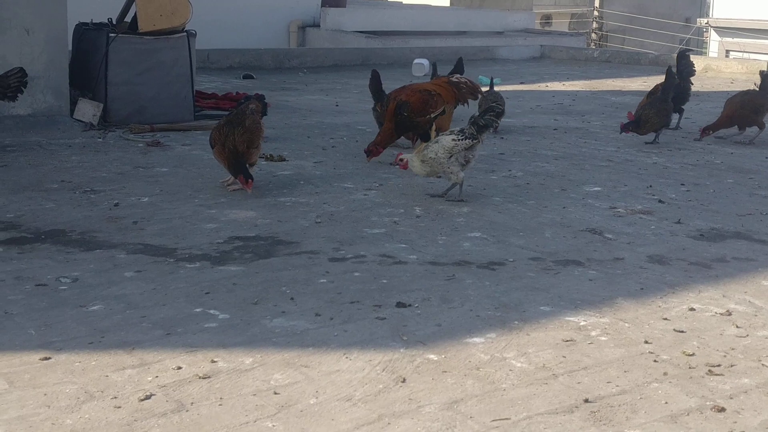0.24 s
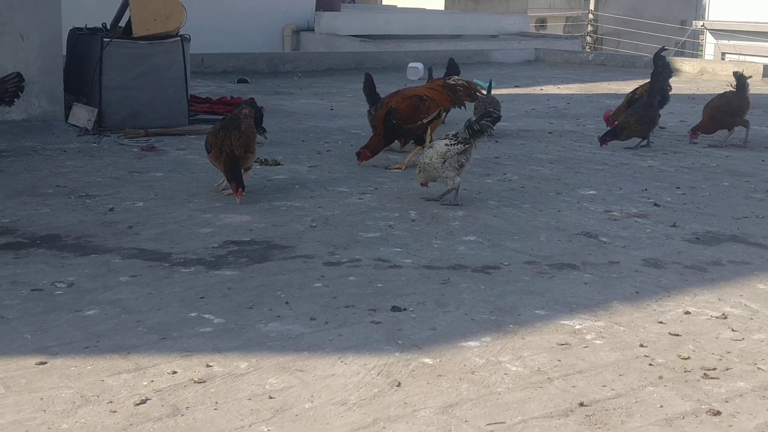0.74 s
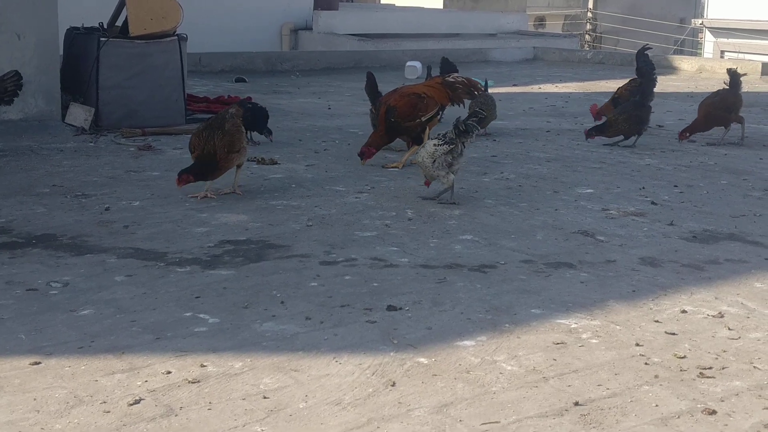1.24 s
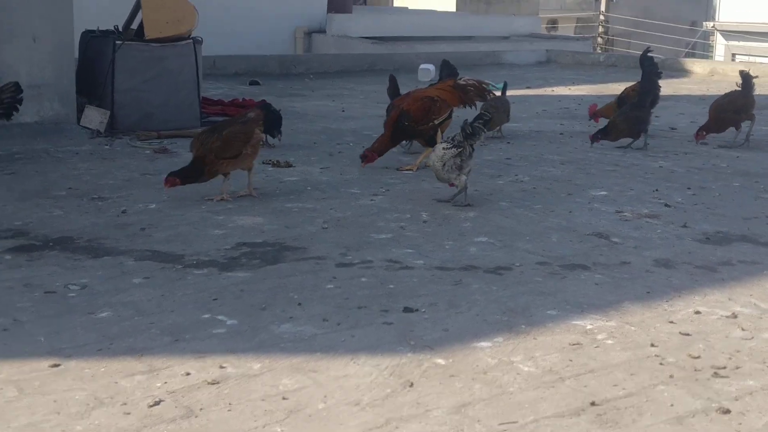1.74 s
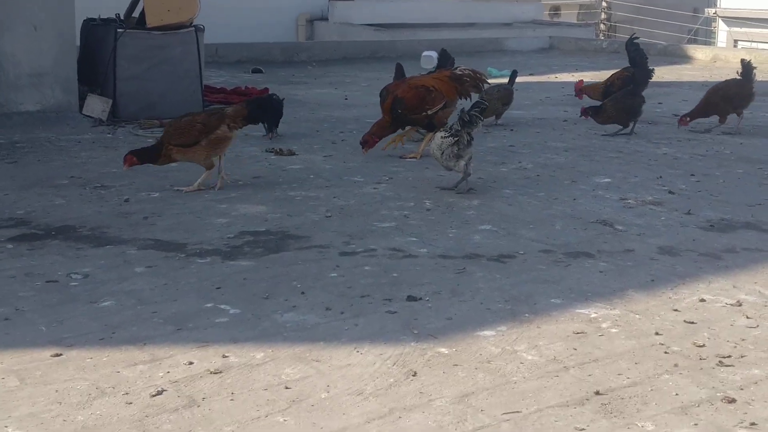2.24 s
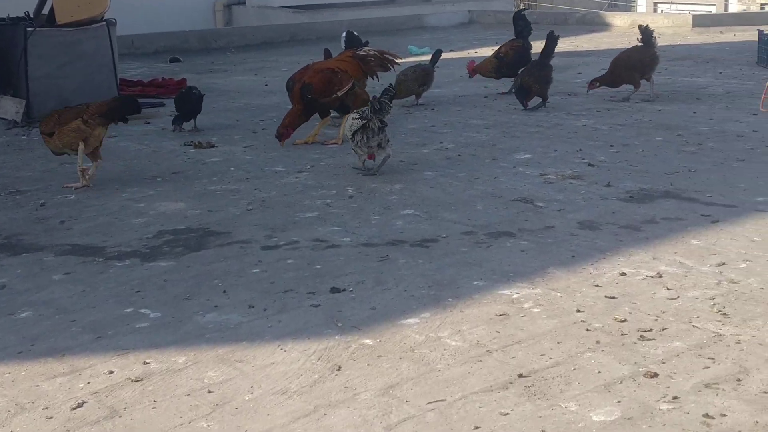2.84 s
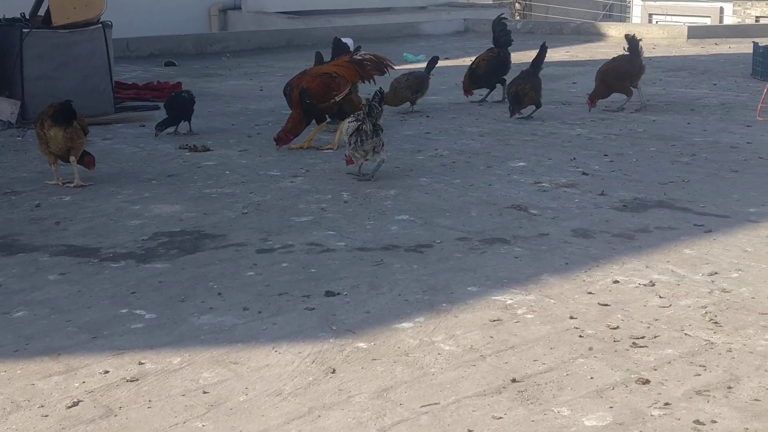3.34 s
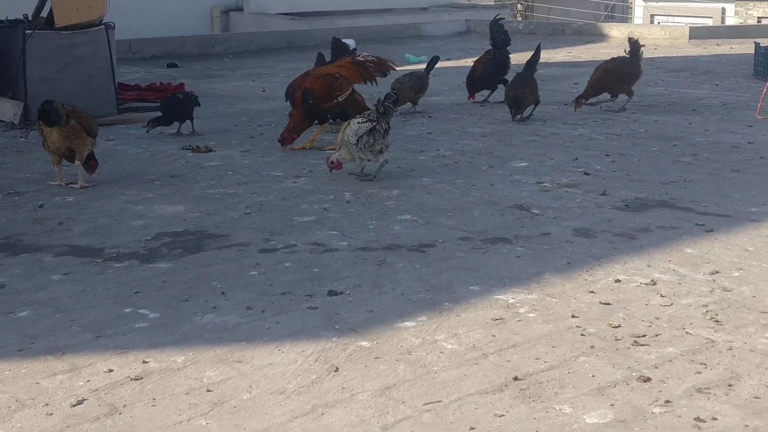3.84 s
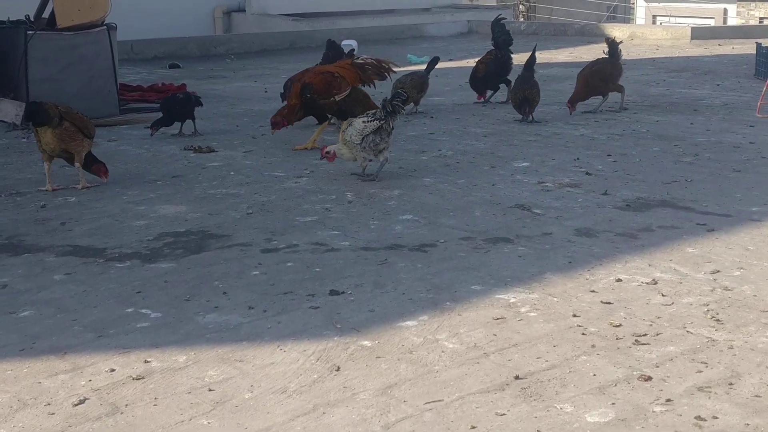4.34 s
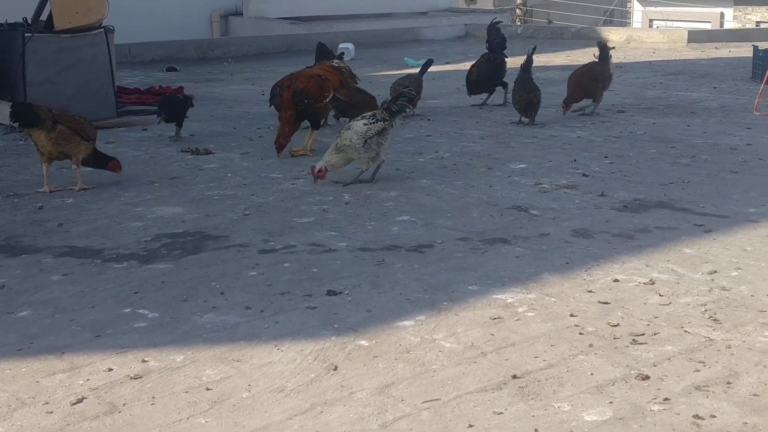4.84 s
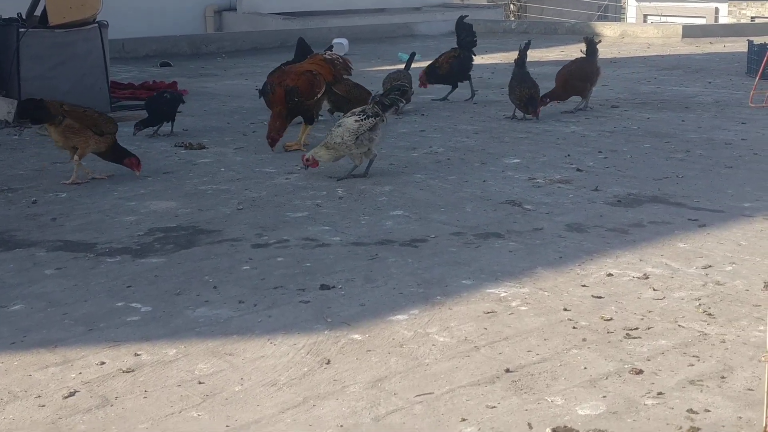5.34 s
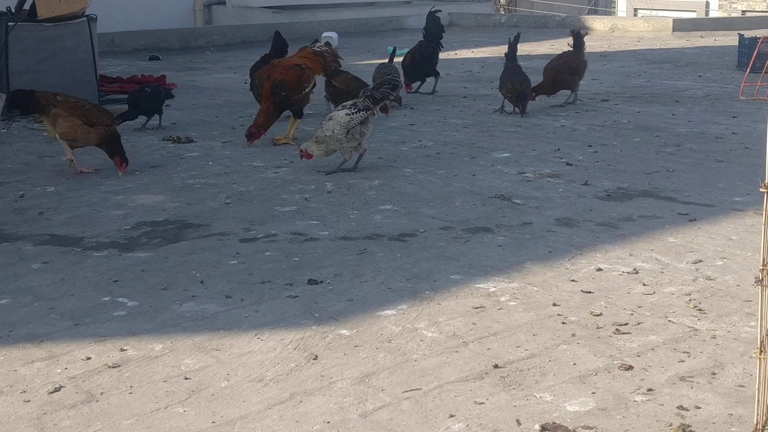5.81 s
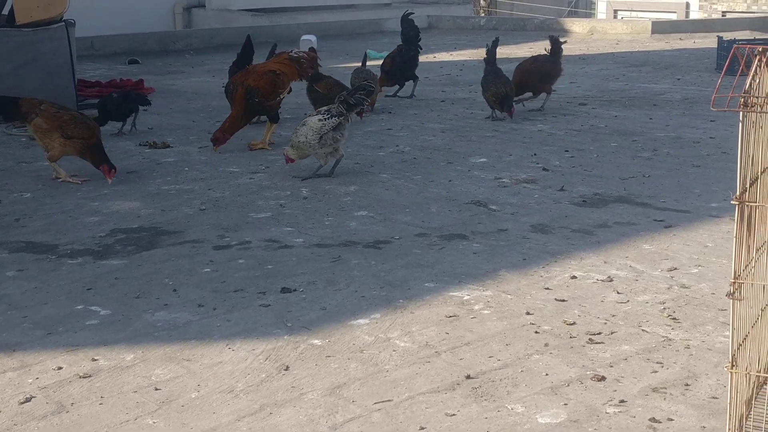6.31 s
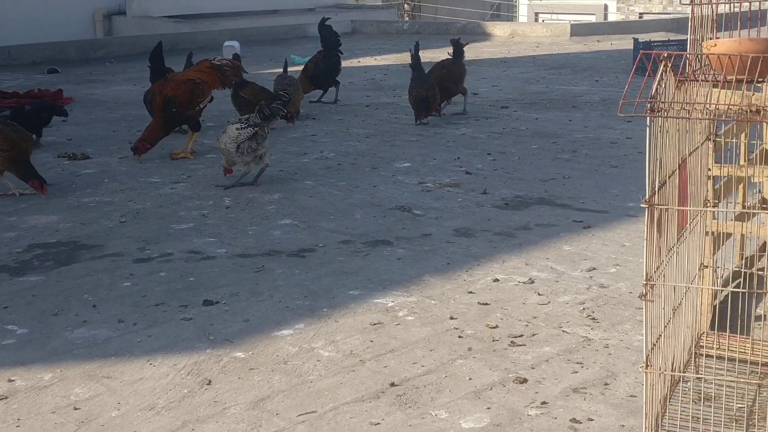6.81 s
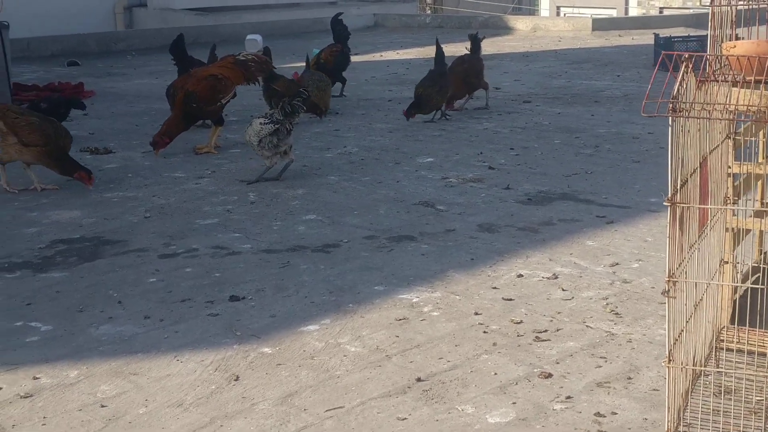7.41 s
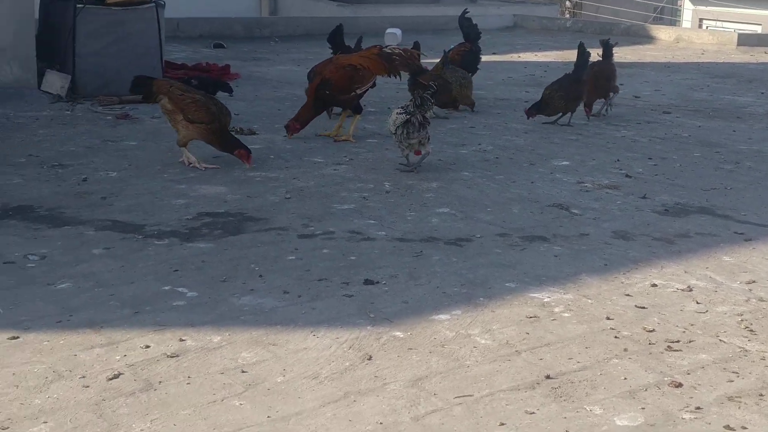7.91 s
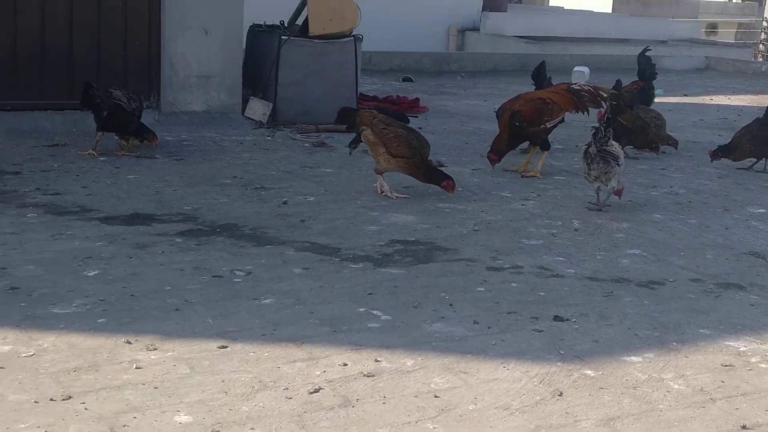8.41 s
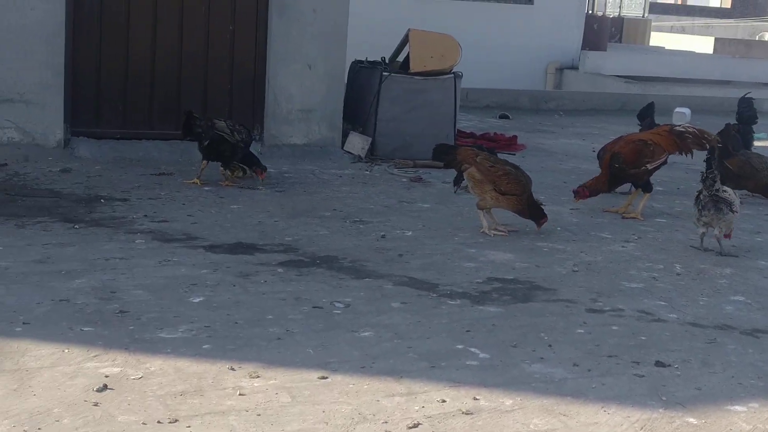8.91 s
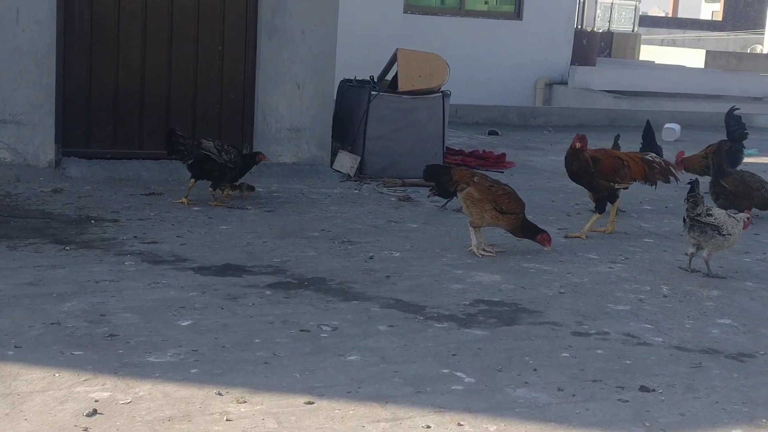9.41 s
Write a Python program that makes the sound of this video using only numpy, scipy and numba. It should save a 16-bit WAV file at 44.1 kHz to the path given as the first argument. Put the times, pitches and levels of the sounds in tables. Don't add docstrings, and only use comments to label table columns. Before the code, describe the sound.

A rooster gives a long run of soft, quick, throaty food clucks across a concrete yard, with faint chick peeps and low distant rumble.

```python
import sys
import numpy as np
from scipy import signal
from scipy.fft import rfft, irfft
from scipy.io import wavfile
from scipy.ndimage import uniform_filter1d
from numba import njit

SR = 44100
rng = np.random.default_rng(int(sys.argv[2]) if len(sys.argv) > 2 else 0)


def waveform_to_disk(signal):
    frames = np.transpose(np.atleast_2d(signal))
    scaled = np.clip(frames, -1, 1) * 32767
    samples = np.round(scaled).astype(np.int16)
    wavfile.write(sys.argv[1], SR, samples)


def decibels_to_gain(level_db):
    exponent = np.asarray(level_db, float) / 20
    return 10 ** exponent


N = 426006
TIME = np.arange(N) / SR
USUAL_MS = 30

# freq_hz, level_db (per Hz)
TOWN_TONE = [(30, -12), (55, 7.5), (130, 2), (250, -6), (420, -16), (620, -7.5), (900, -8.5), (1400, -13),
             (2400, -15.5), (3600, -24.5), (5300, -32.5), (7300, -51.5), (10000, -43.5), (16000, -47)]
# freq_hz, difference_db
PORT_DIFFERENCE = [(60, -10.5), (110, -6.5), (200, -3), (380, -0.5), (700, -3), (1290, -6), (2380, -6.5),
                   (4400, -3.5), (8120, 11), (15000, 12)]
# freq_hz, lead_radians
PORT_LEAD = [(0, .7), (690, 1.1), (1720, 4.3), (2150, 5.9), (3700, 9.8), (4390, 12.7), (22050, 40)]
# start_s, length_ms, level_db
CLOTH_SLIDES = [(.88, 116, -62), (.98, 100, -63), (1.4, 143, -66.5), (1.7, 162, -54.5), (2.0, 62, -65.5),
                (2.29, 95, -61), (2.379, 220, -63.5), (2.56, 71, -54.5), (2.63, 190, -65.5),
                (2.8, 112, -50), (3.02, 147, -54.5), (3.198, 104, -53.5), (3.352, 58, -69.5),
                (5.7, 50, -65.5), (5.81, 55, -59.5), (5.949, 49, -64.5), (6.07, 70, -66), (6.2, 76, -70.5),
                (6.93, 48, -65.5), (7.17, 89, -65.5), (8.87, 76, -64.5), (9.15, 700, -66)]
# freq_hz, level_db (per Hz)
CLOTH_TONE = [(2500, 1), (3500, 5.5), (5500, 1), (7500, -4.5), (9000, 0), (10400, 7), (14000, 0),
              (16000, 2)]
# start_s, peak_db
CLOTH_TICKS = [
    (0.3501, -55),
    (0.401, -48.5),
    (0.5872, -55),
    (1.684, -46),
    (1.9822, -43.5),
    (3.501, -47),
    (5.125, -41.5),
    (6.9164, -61),
    (8.311, -50),
]
# start_s, level_db, top_pitch_hz
CHICK_PEEPS = [(.067, -56, 4900), (.46, -58, 5200), (.624, -53.5, 4930), (.81, -56.5, 4300),
               (.89, -58, 4805), (1.237, -58, 4300), (1.315, -57.5, 4920), (1.474, -54, 4425),
               (4.577, -59.5, 4552), (4.668, -61, 4627), (4.738, -59, 4100), (4.832, -55.5, 5090),
               (4.915, -63, 4564), (5.155, -57, 5060), (5.28, -57, 4090), (5.422, -61, 4300),
               (5.642, -59, 5300), (6.125, -61, 5000), (6.346, -56, 5220), (6.61, -57.5, 4075),
               (6.665, -63.5, 5135), (7.125, -60, 5220), (8.553, -62.5, 5086), (8.799, -56.5, 4300),
               (9.09, -63, 5000), (9.176, -58.5, 3900)]
# start_s, level_db, start_pitch_hz, end_pitch_hz
CHICK_WHINES = [(1.273, -61, 5610, 4976), (1.44, -51.5, 3223, 2655), (2.946, -51, 4300, 3253),
                (2.965, -50.5, 4300, 4440), (6.33, -60.5, 4113, 3686), (3.091, -45, 3990, 3088),
                (3.099, -48.5, 4974, 4300), (3.9, -63, 4000, 2925), (4.554, -64, 5590, 4985),
                (4.879, -69, 5600, 5120), (5.385, -67, 5466, 4870)]
# start_s, length_ms, level_db, start_pitch_hz, end_pitch_hz
HEN_MURMURS = [
    (9.29, 28.4, -43, 302.2, 302),
    (9.369, 23.5, -30.5, 256.7, 297),
    (9.401, 10.1, -34, 305, 312),
    (9.465, 30.4, -37, 356.6, 336.5),
    (9.503, 13.88, -37.5, 357, 373),
    (9.522, 18, -40.5, 317, 318),
]
# start_s, length_ms, level_db,
# attack_pitch_hz
ROOSTER_CLUCKS = [(.003, 47, -34.5, 342), (.05, 11.1, -41.5, 335), (0.152, 16.7, -27.5, 341.8),
                  (0.276, 34.6, -36.5, 349.7), (.344, 26.6, -36.5, 348.3), (.415, 13.8, -24, 333.5),
                  (0.536, 19, -31, 342.8), (0.666, 12.5, -26.5, 353), (.784, 10.9, -27, 319.8),
                  (.896, 16.6, -21, 330.6), (1.016, 19.7, -25, 308), (1.131, 19.9, -24.5, 326.3),
                  (1.257, 20.3, -21, 317.5), (1.38, 21, -22, 322.2), (1.505, 21, -25.5, 317.9),
                  (1.629, 22.2, -22, 316.3), (1.755, 16, -23.5, 306.2), (1.875, 26.5, -25, 310.8),
                  (2.005, 26.8, -25.5, 314), (2.144, 27.6, -23.5, 316), (2.3, 29.8, -22.5, 315.3),
                  (2.451, 10.2, -35, 329), (2.464, 45.4, -25.5, 306.7), (2.578, 31, -23.5, 341.5),
                 (2.607, 21.2, -28.5, 320.6), (2.73, 27.3, -25.5, 315.5), (2.826, 22.3, -25.5, 332.2),
                 (2.964, 24.3, -22, 313.4), (3.104, 23, -25.5, 304.7), (3.247, 29.4, -24.5, 317.3),
                 (3.389, 13, -32, 320.3), (3.401, 14.5, -24, 297.3), (3.418, 18.5, -24.5, 307),
                 (3.566, 34.2, -22.5, 310), (3.723, 25.8, -26.5, 301.6), (3.772, 39, -38, 308.3),
                 (3.814, 21, -25, 325.7), (3.849, 17, -28.5, 331.4), (3.966, 9, -25, 305.2),
                 (3.977, 39, -35, 331.7), (4.121, 31, -28.5, 300.7), (4.266, 35, -28, 305.7),
                 (4.422, 24, -26.5, 318.7), (4.549, 11.2, -35.5, 291.6), (4.56, 29.8, -26, 318.2),
                  (4.672, 14, -31.5, 340.3), (4.684, 11, -21.5, 334), (4.703, 13, -32, 332),
                  (4.794, 34, -29.5, 305.4), (4.92, 31, -27.5, 326.2), (5.051, 33, -27, 334.2),
                  (5.134, 20.7, -25, 326.3), (5.238, 19.6, -26, 335.7), (5.351, 22.8, -26.5, 324.2),
                  (5.471, 27.8, -27, 323.2), (5.593, 25.2, -30, 328.7), (5.709, 28.7, -26, 347.5),
                  (5.823, 33.3, -26, 320.3),
                  (5.953, 29.48, -24, 366.4), (6.082, 35.43, -23, 372), (6.224, 24.66, -24, 403),
                (6.368, 32.68, -29, 431.8), (6.465, 56.4, -28, 354.8), (6.585, 22.83, -26.5, 403.5),
                (6.696, 27.6, -27, 399.5), (6.819, 31.84, -28.5, 398.6), (6.94, 38.04, -27, 369.3),
                (7.075, 36.5, -27.5, 413.5), (7.166, 73.1, -27.5, 334.2), (7.311, 35, -24.5, 383),
                (7.446, 36.24, -23, 390), (7.585, 39.9, -25.5, 373.2), (7.723, 29.8, -27.5, 411.7),
                (7.85, 42.3, -26, 421), (7.914, 76, -28, 372.4), (7.988, 34, -28, 350.2),
                (8.098, 37.2, -26.5, 393.5), (8.234, 34.6, -25.5, 448.8), (8.368, 38.2, -25.5, 407.7),
                (8.49, 34.6, -25.5, 433.4), (8.634, 37.55, -24, 418.5), (8.731, 31.5, -25.5, 413.2),
                (8.874, 40.36, -25, 426.5), (9.057, 48, -24.5, 398.5), (9.126, 59, -31, 390),
                (9.182, 33.4, -34.5, 384.3), (9.526, 12, -33, 321)]
# time_s, resting_pitch_hz, roughness (0-1)
RESTING_MEMBRANE = [(0, 306.7, 0.18), (1.3, 301.3, 0.3), (2.2, 305.9, 0.25), (2.5, 314.3, 0.23),
                    (2.999, 307.3, 0.26), (4.1, 309.1, 0.04), (4.598, 325.9, 0.22), (5.198, 311.6, 0.3),
                    (5.8, 325.8, 0.32), (6.198, 324.7, 0.2), (6.9, 303.4, 0.2), (7.95, 337.7, .15),
                    (8.13, 318, .2), (8.6, 310.1, 0.24), (8.999, 338.8, 0.23)]
# time_s, windpipe_hz, opening (0-1), beak_hz, beak_db
THROAT_SHAPE = [(0, 860, 0.8, 2530, -23), (.85, 955, 0.54, 2770, -17.5), (2, 947, 1, 2504, -22),
                (4.3, 928.8, 1, 2549, -21.5), (4.5, 980, 0.77, 2828, -16), (5.7, 959.4, 0.54, 2806, -21),
                (6, 845, .01, 2779, -22), (7.1, 827, 0.04, 2922, -15.5), (7.7, 889.5, .01, 2932, -22),
                (9.3, 873, 0.05, 2694, -16.5)]
# freq_hz, width_hz, level_db
UPPER_RINGS = [(2127, 597, -29.5), (3510, 990, -41), (4300, 200, -40), (5300, 1300, -45), (6170, 460, -44)]


def level(x, db):
    return x * decibels_to_gain(db) / np.sqrt(np.mean(x ** 2))


def colour(x, table):
    hz, db = np.transpose(table)
    f = np.fft.rfftfreq(N, 1 / SR) + 1
    gain = decibels_to_gain(np.interp(np.log(f), np.log(hz), db))
    return irfft(rfft(x) * gain, N)


@njit
def moving_ring(x, hz, width):
    y, b, l = np.empty(len(x)), 0., 0.
    for i in range(len(x)):
        g, k = np.tan(np.pi * hz[i] / SR), width[i] / hz[i]
        v = (b + g * (x[i] - l)) / (1 + g * (g + k))
        b, l, y[i] = 2 * v - b, l + 2 * g * v, k * v
    return y


def ring(x, hz, width):
    return moving_ring(x + 1e-18, hz + 0 * x, width + 0 * x)


def double_ring(x, hz, width):
    return ring(ring(x, hz, width), hz, width)


def walk(rate):
    k = int(SR / rate)
    held = np.repeat(rng.standard_normal(N // k + 1), k)
    return 1.3 * uniform_filter1d(uniform_filter1d(held, k), k)[:N]


@njit
def membrane(hz, rough, chance, jitter, shimmer):
    y, phase, k = np.zeros(len(hz) + 1), 0., 0
    for i in range(len(hz)):
        step = hz[i] * (1 + jitter * rough[i] * chance[k, 0]) / SR
        phase += step
        if phase >= 1:
            phase, k = phase - 1, k + 1
            size = np.exp(shimmer * rough[i] * chance[k, 1])
            y[i] += size * phase / step
            y[i + 1] += size * (1 - phase / step)
    return y[:-1]


def notes(table, rise_s, fall_s, lead_db, lead_s, swell_db):
    push, hz, rough = np.zeros(N), np.full(N, 300.), np.zeros(N)
    tail_db, tail_s = -12, .018
    for s, ms, db, start_hz, end_hz, r in table:
        a, b = max(int((s - .04) * SR), 0), min(int((s + ms / 1000 + .06) * SR), N)
        t = TIME[a:b] - s
        after = t - ms / 1000
        u = np.clip(t * 1000 / ms, 0, 1)
        murmur = decibels_to_gain(lead_db) * np.exp(np.minimum(t, 0) / lead_s)
        attack = 1 / (1 + np.exp(-t / (rise_s * max(ms / USUAL_MS, 1) ** 2)))
        opening = murmur + (1 - decibels_to_gain(lead_db)) * attack
        closing = 1 / (1 + np.exp(after / fall_s))
        leak = decibels_to_gain(tail_db) * np.exp(np.minimum(-after, 0) / tail_s)
        shape = decibels_to_gain(db + swell_db * (2 * u - 1)) * opening * np.maximum(closing, leak)
        louder = np.flatnonzero(shape > push[a:b])
        push[a + louder] = shape[louder]
        bend = start_hz + (end_hz - start_hz) * u ** 1.3
        pitch = bend - 1800 * np.maximum(after, 0) + 1500 * np.minimum(t, 0)
        hz[a + louder] = pitch[louder]
        rough[a + louder] = np.clip(r + .15 * (2 * u - 1) ** 2, 0, 1)[louder]
    return push, hz, rough


def voice(table, **shape):
    push, hz, rough = notes(table, **shape)
    chance = np.clip(rng.standard_normal((N // 50, 2)), -2, 2)
    pulses = membrane(hz, rough, chance, jitter=.12, shimmer=.5)
    return push, level(pulses, 0) * push, hz


def ports(x):
    f = np.fft.rfftfreq(N, 1 / SR)
    lead = np.exp(1j * np.interp(f, *np.transpose(PORT_LEAD)))
    return np.array([colour(irfft(rfft(x) * lead, N), PORT_DIFFERENCE), x])


def yard(x, t60_s, wet_db, echo_s, echo_db):
    t = TIME[:SR // 2]
    tail = rng.standard_normal(len(t)) * np.exp(-np.log(1000) * t / t60_s) * (t > .008)
    tail = ring(tail, 1020, 3300)
    tail *= decibels_to_gain(wet_db) / np.sqrt(np.sum(tail ** 2))
    tail[0] += 1
    tail[int(echo_s * SR)] += decibels_to_gain(echo_db)
    return signal.fftconvolve(x, tail)[:N]


def town():
    gust_s, gust_width_s, gust_db = 1.16, 0.37, 4.5
    gust = gust_db * np.exp(-((TIME - gust_s) / gust_width_s) ** 2)
    out = 0
    for hz in 45 * 2. ** np.arange(9):
        alike = np.clip(1.0 - hz / 2500, 0, .97)
        shared = ports(rng.standard_normal(N))
        left_db = np.interp(hz, *np.transpose(PORT_DIFFERENCE))
        own = rng.standard_normal((2, N)) * decibels_to_gain([[left_db], [0]])
        mix = np.sqrt(alike) * shared + np.sqrt(1 - alike) * own
        swell = gust * (hz < 100) + 1.5 * walk(6) + .8 * walk(.7)
        edges = [hz / np.sqrt(2), min(hz * np.sqrt(2), 20000)]
        octave = signal.butter(2, edges, "band", fs=SR, output="sos")
        out = out + decibels_to_gain(swell) * signal.sosfilt(octave, mix)
    return level(np.array([colour(c, TOWN_TONE) for c in out]), -46)


def flock():
    start_db, fade_db_per_s, lowest_db = -57.5, 5, -68.5
    blur = double_ring(rng.standard_normal(N), 570, 220)
    fade = np.maximum(start_db - fade_db_per_s * TIME, lowest_db)
    return level(blur, 0) * decibels_to_gain(fade + 3.3 * walk(3.4))


def swift():
    length_s, level_db, base_hz, arch_hz = .33, -69, 9500, 1400
    out, u = np.zeros(N), np.linspace(0, 1, int(length_s * SR))
    arch = np.sqrt(np.abs(np.sin(np.pi * u ** 1.5)))
    whistle = arch * np.sin(2 * np.pi * np.cumsum(base_hz + arch_hz * arch) / SR)
    for s in (5.87, 8.85):
        out[int(s * SR):][:len(u)] += whistle
    return decibels_to_gain(level_db + 2.5 * walk(40)) * out


def cloth():
    push = np.zeros(N)
    for s, ms, db in CLOTH_SLIDES:
        n = min(int(ms * SR / 1000), N - int(s * SR))
        push[int(s * SR):][:n] += decibels_to_gain(db) * np.sin(np.pi * np.arange(n) / n) ** .8
    push *= decibels_to_gain(0.8 * walk(35))
    snaps = rng.random(N) < 400 / SR
    snaps = snaps * decibels_to_gain(1.5 * rng.exponential(size=N)) * rng.standard_normal(N)
    hiss = level(rng.standard_normal(N), 0)
    left = push * level(hiss + level(snaps, -10), 6)
    for s, db in CLOTH_TICKS:
        left[int(s * SR):][:80] += decibels_to_gain(db + 5) * rng.standard_normal(80) * np.exp(-np.arange(80) / 25)
    right = decibels_to_gain(-38) * np.roll(left, 9) + decibels_to_gain(-34) * push * rng.standard_normal(N)
    return np.array([colour(c, CLOTH_TONE) for c in (left, right)]) * decibels_to_gain(3)


def bump():
    start_s, level_db, pitch_hz = 7.191, -20.5, 181.8
    t = TIME - start_s
    turn = 2 * np.pi * pitch_hz * (t - 30 * np.clip(t, -.01, .012) ** 2)
    swell = np.exp(-(t / np.where(t < 0, .004, .007)) ** 2)
    return -decibels_to_gain(level_db) * swell * np.cos(turn) * np.array([[0], [1]])


def chicks():
    out = np.zeros(N)
    peeps = [(s, db, 2400, hz) for s, db, hz in CHICK_PEEPS]
    for table, ms in ((peeps, 28), (CHICK_WHINES, 28.4)):
        u = np.linspace(0, 1, int(ms * SR / 1000))
        swell = np.sqrt(np.abs(np.sin(np.pi * u)))
        for s, db, start_hz, end_hz in table:
            hz = end_hz + (start_hz - end_hz) * (1 - u) ** 2.5
            whistle = swell * np.sin(2 * np.pi * np.cumsum(hz) / SR)
            out[int(s * SR):][:len(u)] += decibels_to_gain(db + 4) * whistle
    return out


def hen():
    rows = [(*row, .03) for row in HEN_MURMURS]
    push, pulses, hz = voice(rows, rise_s=0.002, fall_s=0.0028, lead_db=-23.5, lead_s=0.0166, swell_db=0.5)
    throat_hz = 2 * uniform_filter1d(hz, size=200)
    throat = ring(ring(pulses, throat_hz, 227), throat_hz, 226)
    mouth = ring(ring(pulses, 1410, 900), 1390, 898)
    return decibels_to_gain(16.5) * (throat + decibels_to_gain(-19.5) * mouth)


def clucks():
    firm_db, rough_per_db = -26, 0.28
    s, ms, db, hz = np.transpose(ROOSTER_CLUCKS)
    at, rest_hz, rough = np.transpose(RESTING_MEMBRANE)
    rough = np.interp(s, at, rough) + rough_per_db * np.maximum(firm_db - db, 0)
    rough = rough * np.minimum(USUAL_MS / ms, 1) ** 2
    end_hz = np.interp(s + ms / 1000, at, rest_hz)
    return np.transpose([s, ms, db, hz, end_hz, rough])


def hum():
    pitch_hz, sag_hz_per_s, lead_s, width_s = 514, 4100, .015, 0.0087
    level_db, fade_db_per_s, octave_db, pause_s = -37, 1, 1.5, .07
    out, starts = np.zeros(N), clucks()[:, 0]
    starts = starts[np.diff(starts, prepend=0) > pause_s]
    half = SR // 40
    t = np.arange(-half, half) / SR
    for s, (up, db) in zip(starts, rng.standard_normal((len(starts), 2))):
        turn = 2 * np.pi * (pitch_hz * (1 + 0.05 * up) * t - sag_hz_per_s * t ** 2 / 2)
        size = decibels_to_gain(level_db - fade_db_per_s * s + db) * np.exp(-(t / width_s) ** 2)
        tone = decibels_to_gain(-2 * fade_db_per_s * s) * np.sin(turn) + decibels_to_gain(octave_db) * np.sin(2 * turn)
        out[int((s - lead_s) * SR) - half:][:len(t)] += size * tone
    return out


def rooster():
    s, *columns = np.transpose(THROAT_SHAPE)
    pipe_hz, opening, beak_hz, beak_db = (np.interp(TIME, s, c) for c in columns)
    opening = np.clip(opening, 0, 1)
    width, skirt = 120 + 375 * (1 - opening) ** 3, 895 + 1590 * opening
    push, pulses, hz = voice(clucks(), rise_s=.0012, fall_s=.004, lead_db=-16, lead_s=.015, swell_db=-0.5)
    pulses = pulses * decibels_to_gain(1.8 * walk(70))
    stretch = uniform_filter1d(hz, size=200) / np.interp(TIME, *np.transpose(RESTING_MEMBRANE)[:2])
    pipe_hz = pipe_hz * np.minimum(stretch, 1) ** 0.42 * (1 + 0.052 * walk(25))
    sound = moving_ring(pulses, pipe_hz, width)
    sound = moving_ring(sound, pipe_hz, skirt)
    sound = moving_ring(sound, 1.1 * pipe_hz, skirt) * np.sqrt(130 / width)
    sound = signal.sosfilt(signal.butter(3, 2900, fs=SR, output="sos"), sound)
    beak_hz = beak_hz + 50 * walk(9)
    sound -= decibels_to_gain(beak_db + 2.0 * walk(14)) * double_ring(pulses, beak_hz, 280)
    for ring_hz, width_hz, db in UPPER_RINGS:
        sound += decibels_to_gain(db + 3.7 * walk(11)) * double_ring(pulses, ring_hz, width_hz)
    sound += decibels_to_gain(-21.5) * (skirt / 2500) ** 2 * double_ring(pulses, 1920, 430)
    sound += decibels_to_gain(-22.5) * (0.15 + opening) * double_ring(pulses, 343, 150)
    breath = push * decibels_to_gain(walk(11)) * ring(rng.standard_normal(N), 12060, 3100)
    return decibels_to_gain(18.5) * sound + decibels_to_gain(-39.5) * breath


def scene():
    others = yard(hen() + chicks() + swift(), t60_s=.2, wet_db=-17, echo_s=.03, echo_db=-20)
    others = others * decibels_to_gain(np.array([[0.], [-5]]))
    cock = yard(rooster() + hum(), t60_s=0.11, wet_db=-16, echo_s=.068, echo_db=-31)
    return town() + cloth() + bump() + others + ports(cock + flock())


def roll_off(x):
    return signal.sosfilt(signal.butter(12, 15750, fs=SR, output="sos"), x)


def record(dry):
    heard = signal.sosfilt(signal.butter(6, 44, "high", fs=SR, output="sos"), dry)
    return roll_off(heard)


dry = scene()
out = record(dry)
waveform_to_disk(out)
```